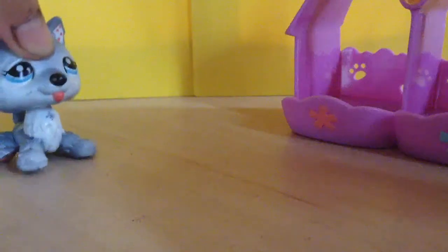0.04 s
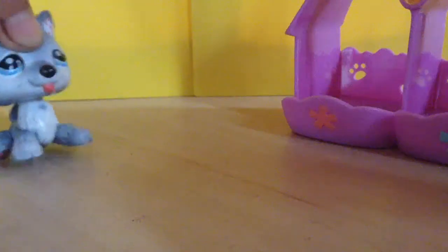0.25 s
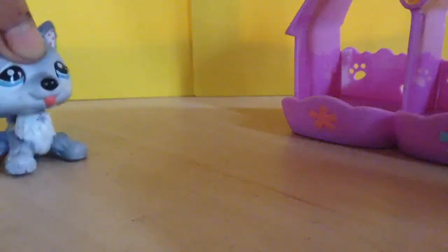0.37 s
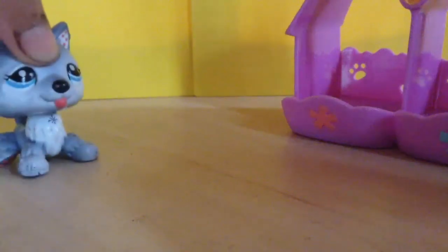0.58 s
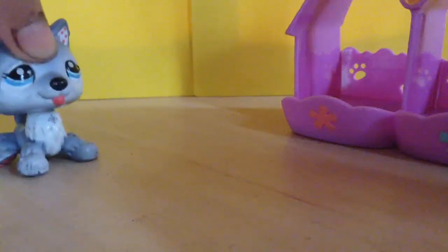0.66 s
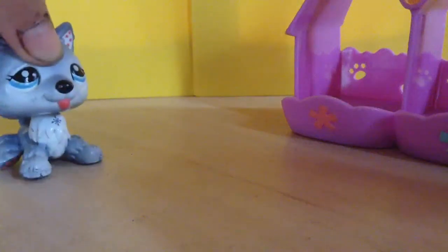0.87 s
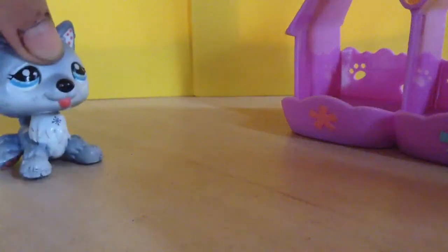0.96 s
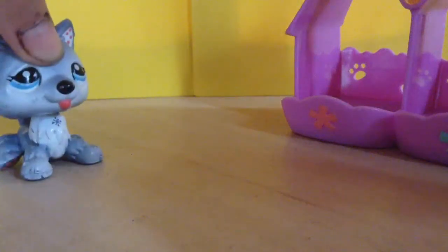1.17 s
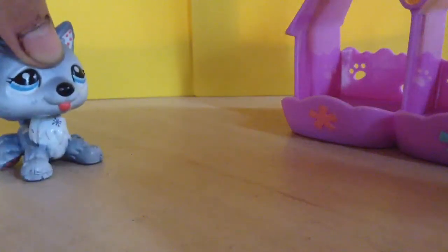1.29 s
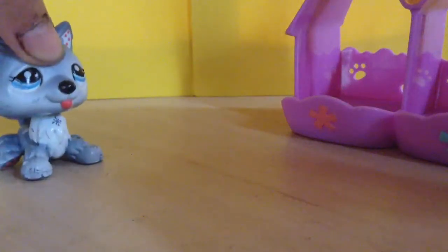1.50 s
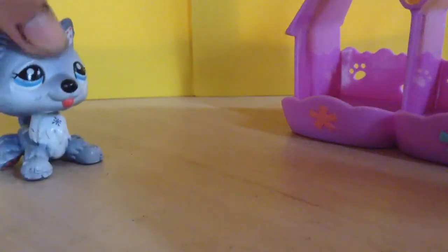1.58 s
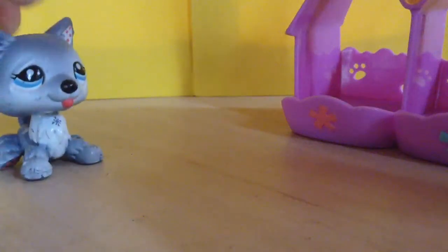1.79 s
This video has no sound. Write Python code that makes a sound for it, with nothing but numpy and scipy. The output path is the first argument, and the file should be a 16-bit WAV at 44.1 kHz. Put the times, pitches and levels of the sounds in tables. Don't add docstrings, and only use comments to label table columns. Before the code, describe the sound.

Small plastic toy knocking on a wooden table in uneven bursts, with faint scrapes and clicks

```python
import sys
import numpy as np
from scipy import signal
from scipy.fft import rfft, irfft
from scipy.io import wavfile

SR = 44100
rng = np.random.default_rng(int(sys.argv[2]) if len(sys.argv) > 2 else 0)


def log_audio(samples):
    frames = np.atleast_2d(samples).T
    limited = np.clip(frames, -1, 1)
    pcm = np.round(limited * 32767).astype(np.int16)
    wavfile.write(sys.argv[1], SR, pcm)


def gain_from_db(level_db):
    decades = np.asarray(level_db, float) / 20
    return 10 ** decades


N = 81585

# t/s, peak level/dB, centre of the ring f/Hz, edge over ring level/dB
HOP_TAPS = [(0.019, -54, 660, -37), (0.028, -51, 644, -47), (0.053, -50, 1010, -32),
            (0.0604, -37, 1000, -45.5), (0.0655, -43, 1120, -24.5), (0.1085, -35.5, 930, -31),
            (0.1148, -36, 1000, -34), (0.1175, -38.5, 1020, -37), (0.1295, -35.5, 960, -41),
            (0.1368, -48, 1190, -12.5), (0.202, -50.5, 1000, -35), (0.2275, -35.5, 756, -7),
            (0.2291, -21.5, 870, -19.5), (0.232, -35, 810, -22), (0.2355, -43, 1390, -22),
            (0.257, -43, 775, -15), (0.3383, -18, 1000, -15), (0.3418, -44, 710, -6),
            (0.353, -16.5, 946, -17.5), (0.3562, -28, 791, -8.5), (0.3583, -17, 1025, -27.5),
            (0.3608, -22, 894, -33), (0.3636, -22.5, 634, -31), (0.3675, -38, 1464, -31),
            (0.372, -31, 617, -22), (0.3795, -20, 1034, -11.5), (0.386, -56.5, 972, 10),
            (0.451, -38.5, 880, -20.5), (0.4712, -45, 840, -32), (0.4973, -28, 865, -40.5),
            (0.5015, -35, 980, -16), (0.51, -31, 790, -20.5), (0.5145, -41, 700, -47),
            (0.517, -43, 610, -37), (0.5195, -44.5, 620, -50), (0.5765, -22.5, 632, -21.5),
            (0.58, -29.5, 606, -25), (0.595, -24.5, 920, -15), (0.5966, -29, 773, -33),
            (0.5977, -23, 920, -28.5), (0.6113, -30, 1110, -7), (0.614, -19, 950, -17.5),
            (0.6195, -55, 1180, -11), (0.708, -48.5, 1054, -29), (0.721, -26, 730, -18.5),
            (0.758, -38, 616, -3.5), (0.767, -66.5, 638, 17)]
# t/s, peak level/dB, centre of the ring f/Hz, edge over ring level/dB
SHUFFLE_TAPS = [(0.8266, -14, 990, -15.5), (0.8297, -24, 1020, -32), (0.8322, -31.5, 1000, -6),
                (0.8452, -30.5, 1260, -24.5), (0.847, -37, 604, -39), (0.8485, -22, 610, -35.5),
                (0.8627, -30.5, 1000, -35), (0.871, -27, 630, -15), (0.88, -54.5, 650, 8),
                (1.033, -49.5, 1000, -38), (1.04, -44.5, 590, -55.5), (1.086, -41.5, 600, -21),
                (1.105, -41.5, 1070, -26.5), (1.118, -54.5, 1060, -29), (1.1258, -34, 810, -25),
                (1.128, -39, 780, -32), (1.135, -26, 730, -42), (1.2285, -53.5, 1050, -20),
                (1.245, -52, 1030, -13), (1.287, -40, 740, -15), (1.292, -37, 846, -32),
                (1.2955, -25, 704, -24.5), (1.2988, -41.5, 706, -32.5), (1.3075, -55, 690, -7),
                (1.344, -44, 745, -33), (1.3505, -40.5, 895, -5), (1.5903, -32.5, 876, -11.5),
                (1.592, -26.5, 995, -36.5), (1.601, -28.5, 950, -34.5), (1.614, -74, 654, -28),
                (1.625, -39.5, 640, -42), (1.647, -39.5, 600, -17.5), (1.747, -48.5, 604, -54.5),
                (1.76, -73.5, 560, -32), (1.7765, -51, 1160, -21.5)]
# t/s, peak level/dB, centre f/Hz
HEAD_TICKS = [(0.053, -64, 10400), (0.0633, -54, 8220), (0.138, -59, 9070), (0.228, -51, 6350),
              (0.336, -51, 7400), (0.359, -48.5, 7600), (0.4775, -51.5, 11100), (0.497, -56.5, 10300),
              (0.595, -61, 6850), (0.6084, -55, 10800), (0.614, -54, 10100), (0.709, -59.5, 6500),
              (0.7558, -57, 6700), (0.826, -43, 8500), (0.846, -48, 7300), (0.8615, -45, 9350),
              (0.8735, -53, 10200), (1.033, -53.5, 10200), (1.04, -60.5, 10400), (1.1033, -65.5, 10200),
              (1.125, -51.5, 11900), (1.287, -50.5, 12700), (1.5729, -43, 9360), (1.5823, -52.5, 9250),
              (1.591, -43.5, 8260), (1.6457, -63.5, 10600), (1.7459, -64.5, 7550)]
# t/s, peak level/dB, centre f/Hz
HIT_CRACKS = [
    (0.3387, -37, 2350),
    (0.3538, -34, 3900),
    (0.3803, -52, 3900),
    (0.5771, -48, 3800),
    (0.6125, -39, 3800),
    (0.8269, -37.5, 3900),
    (1.137, -49.5, 2350),
    (1.5905, -43.5, 3550),
    (1.7775, -66, 2000),
]
# t/s, peak level/dB, centre f/Hz
SLIDE_CATCHES = [
    (1.3002, -48, 2300),
    (1.3078, -46, 2300),
    (1.3292, -46, 2500),
    (1.3502, -37, 2600),
]
# f/Hz, level/dB, time to fade by 60 dB t/s
BODY_MODES = [(598, -15.5, 0.047), (680, 10, 0.02), (790.7, 10.5, 0.016), (945.3, 11.5, 0.017),
              (1033, -9.5, 0.041), (1050, -21, 0.0033), (1453, 7, 0.029), (1414, -34, 0.014),
              (1510, -37.5, 0.0073), (1186, -40, 0.0081)]
# f/Hz, level/dB, time to fade by 60 dB t/s
TABLE_MODES = [(178.3, -1, 0.11), (280.2, -4.5, 0.13), (307.5, -4, 0.068), (359.4, -2, 0.04),
               (609.5, -0.5, 0.078)]
# f/Hz, level/dB, time to fade by 60 dB t/s
SHELL_MODES = [(2000, 1, 0.0022), (2350, 4.5, 0.017), (2800, 2.5, 0.0086), (3610, 10, 0.0034),
               (3900, -12.5, 0.0074), (3990, -15.5, 0.003), (4700, -15, 0.005), (5530, 1.5, 0.0075)]
# f/Hz, level/dB, time to fade by 60 dB t/s
JOINT_MODES = [(3800, 5.5, 0.013), (5550, 0, 0.00075), (7356, -2.5, 0.0076), (9020, -2, 0.007),
               (10200, 4, 0.0047), (10750, 2, 0.0015), (12580, 0, 0.0044), (15600, 8.5, .003)]
# t/s, level/dB
RUB_LEVEL = [(0.0, -68), (0.158, -63), (0.488, -62.5), (0.556, -61), (0.746, -62.5), (0.854, -66.5),
             (0.949, -67), (1.225, -63.5), (1.39, -98), (1.618, -61), (1.802, -68), (1.85, -75)]
# f/Hz, width f/Hz, level/dB
RUB_TONE = [(300, 160, 3), (515, 90, -1.5), (1000, 51, 3), (1416, 140, -2.5), (2350, 83, -11),
            (3700, 200, -16.5)]
# start t/s, length t/s, level/dB, squeak f/Hz, squeak over rub level/dB
SHORT_SCRAPES = [(0.135, 0.025, -71, 229, 14), (0.249, 0.03, -81, 3900, 3),
                 (0.468, 0.057, -67.5, 3800, -6.5), (0.876, 0.044, -66, 3700, -13.5),
                 (1.034, .01, -72, 3700, 1), (1.105, 0.036, -75, 3800, 3),
                 (1.124, 0.0058, -69.5, 4460, 6.5), (1.153, 0.036, -76.5, 1000, 14),
                 (1.226, 0.08, -73, 2350, -4.5), (1.307, 0.0496, -53, 2390, -9),
                 (1.319, 0.017, -70.5, 2920, 9.5), (1.283, 0.081, -80, 4230, 4.5),
                 (1.398, 0.056, -75, 282, -6), (1.573, 0.025, -61.5, 3900, -9),
                 (1.586, 0.027, -63, 2660, -7), (1.741, 0.036, -71.5, 283, 13),
                 (0.06, 0.015, -82.5, 4170, 2), (0.611, 0.018, -89, 11500, 9),
                 (0.824, 0.067, -85.5, 9000, 7), (1.575, 0.04, -85.5, 10000, 9),
                 (1.283, 0.032, -89, 12400, 10), (1.399, 0.026, -87.5, 2600, 8),
                 (0.355, 0.035, -83, 3800, 4)]
# f/Hz, level/dB (per Hz)
HISS_COLOUR = [(40, -22.5), (110, -2.5), (746, -0.5), (1140, -4.5), (2220, -8), (3140, -5.5), (4560, -7.5),
               (15000, -9.5)]

RISE_S = 0.0004
LAG_S = 0.0005


def place(out_len, t_s, sound):
    out = np.zeros(out_len + len(sound))
    i = int(max(t_s, 0) * SR)
    out[i:i + len(sound)] = sound
    return out[:out_len]


def ring(modes, focus_hz, focus_oct, chance, rattle_s=0, rise_s=RISE_S):
    hz, db, t60 = np.array(modes, float).T[:, :, None]
    level_chance, pitch_chance = chance[:len(hz), None], chance[-len(hz):, None]
    t = np.arange(5000) / SR
    octaves_off = np.log2(hz / focus_hz)
    db = db + 2.5 * level_chance - 6 * np.minimum((octaves_off / focus_oct) ** 2, 2.6)
    hz = hz * (1 + 0.02 * pitch_chance)
    fade = np.exp(-np.log(1000) * t / t60)
    y = -(gain_from_db(db) * np.sin(2 * np.pi * hz * t) * fade).sum(axis=0)
    if rattle_s:
        rattle = chance * np.exp(-t[:len(chance)] / rattle_s)
        y = signal.fftconvolve(y, rattle)[:len(t)]
    else:
        y = y * (1 - np.exp(-(t / rise_s) ** 2))
    return y / np.abs(y).max()


def band(x, hz, width_hz):
    return signal.lfilter(*signal.iirpeak(hz, hz / width_hz, fs=SR), x)


def taps(table):
    board_db, shell_db, softer_per_db = -10.5, -3, 0.28
    chance = rng.standard_normal((len(table), 800))
    y = 0
    for (s, db, hz, edge_db), c in zip(table, chance):
        rise_s = RISE_S * max(gain_from_db(-softer_per_db * (edge_db + 15)), 1)
        body = ring(BODY_MODES, hz, 0.42, c, rise_s=rise_s)
        board = ring(TABLE_MODES, 270.0, 5.6, c[50:], rise_s=rise_s)
        wood = body + gain_from_db(board_db) * board
        edge = gain_from_db(edge_db + shell_db) * ring(SHELL_MODES, 4100.0, 5.6, c, rattle_s=0.0006)
        wood_start_s = s + LAG_S + RISE_S - rise_s
        y = y + gain_from_db(db) * (place(N, wood_start_s, wood) + place(N, s + LAG_S, edge))
    return signal.sosfilt(signal.butter(5, 4700, fs=SR, output="sos"), y)


def ticks():
    chance = rng.standard_normal((len(HEAD_TICKS), 800))
    y = 0
    for (s, db, hz), c in zip(HEAD_TICKS, chance):
        click = ring(JOINT_MODES, hz, 0.15, c, rattle_s=0.0017)
        y = y + place(N, s, gain_from_db(db) * click)
    return y


def drag():
    grains_per_s, grain_spread_db, biggest_grain = 1700, 3.5, 2.5
    rub_db, squeak_q = -5, 5.5
    attack_s, fade_s = 0.0019, 0.005
    hit = rng.random(N) < grains_per_s / SR
    size = np.minimum(rng.exponential(size=N), biggest_grain)
    sign = np.sign(rng.standard_normal(N))
    grains = hit * gain_from_db(grain_spread_db * size) * sign

    rub = 0
    for hz, width_hz, db in RUB_TONE:
        wide_hz = 2.75 * width_hz
        tone = band(band(grains, hz, wide_hz), hz, wide_hz)
        rub = rub + gain_from_db(db) * tone / np.sqrt(width_hz)
    rub = rub / rub.std()

    t = np.arange(N) / SR
    s, db = np.array(RUB_LEVEL).T
    y = rub * gain_from_db(rub_db + np.interp(t, s, db))
    for start, length, level_db, hz, squeak_db in SHORT_SCRAPES:
        attack = np.clip((t - start) / attack_s, 0, 1)
        fade = np.exp(-np.maximum(t - start - length, 0) / fade_s)
        squeak = band(band(grains, hz, hz / squeak_q), hz, hz / squeak_q)
        squeak = squeak / squeak.std()
        y = y + attack * fade * gain_from_db(level_db) * (rub + gain_from_db(squeak_db) * squeak)
    return y


def snaps():
    events = SLIDE_CATCHES + HIT_CRACKS
    chance = rng.standard_normal((len(events), 800))
    y = 0
    for (s, db, hz), c in zip(events, chance):
        crack = ring(SHELL_MODES, hz, 0.5, c, rise_s=0.0002)
        y = y + place(N, s, gain_from_db(db) * crack)
    return signal.sosfilt(signal.butter(8, 4400.0, fs=SR, output="sos"), y)


def room(x):
    t60_s, gap_s, move_s = 0.14, 0.004, 0.02
    level_db, top_hz = -12.5, 6900
    t = np.arange(int(0.35 * SR)) / SR
    fade = np.exp(-np.log(1000) * t / t60_s) * (1 - np.exp(-(t / gap_s) ** 2))
    hop = int(move_s * SR)
    out = np.zeros(N + len(t) + 4 * hop)
    x = np.pad(x, (hop, 2 * hop))
    for i in range(0, N + hop, hop):
        piece = x[i:i + 2 * hop] * np.hanning(2 * hop)
        reflections = fade * rng.standard_normal(len(t))
        wet = signal.fftconvolve(piece, reflections)
        out[i:i + len(wet)] += wet
    out = signal.lfilter(*signal.butter(1, top_hz, fs=SR), out[hop:hop + N])
    return gain_from_db(level_db) * out / np.sqrt(np.sum(fade ** 2))


def hiss():
    hz, db = np.array(HISS_COLOUR).T
    f = np.maximum(np.fft.rfftfreq(N, 1 / SR), 1)
    colour = gain_from_db(np.interp(np.log(f), np.log(hz), db))
    y = irfft(rfft(rng.standard_normal(N)) * colour, N)
    return y / y.std() * gain_from_db(-77.5)


def microphone(toy):
    heard = toy + room(toy)
    near = signal.sosfilt(signal.butter(7, 240, "high", fs=SR, output="sos"), heard)
    near = near - band(near, 444.4, 124)
    thump_band = signal.butter(2, [45.0, 110.0], "band", fs=SR, output="sos")
    thump = gain_from_db(-16) * signal.sosfilt(thump_band, toy ** 2)
    return near + thump - thump.mean()


def scene():
    toy = taps(HOP_TAPS) + taps(SHUFFLE_TAPS) + ticks() + drag() + snaps()
    return (microphone(toy) + hiss())[None]


def low_pass(x):
    return signal.sosfilt(signal.butter(12, 15770, fs=SR, output="sos"), x)


def record(dry):
    treble_cut = signal.ellip(6, 0.5, 40, 15000, fs=SR, output="sos")
    mix = signal.sosfilt(treble_cut, dry)
    return low_pass(mix)


dry = scene()
out = record(dry)
log_audio(out)
```